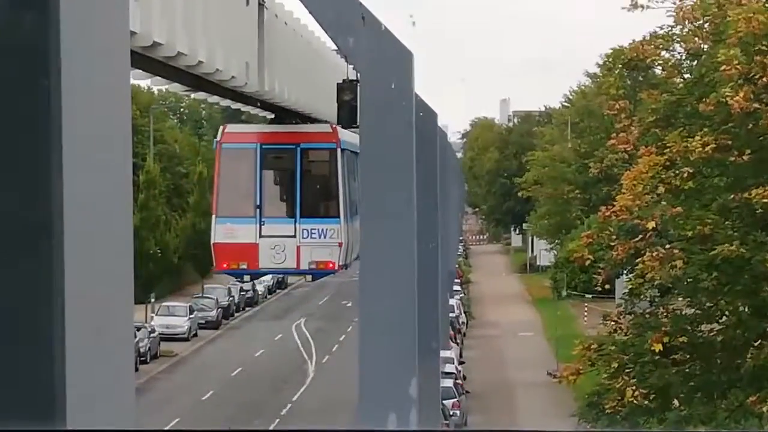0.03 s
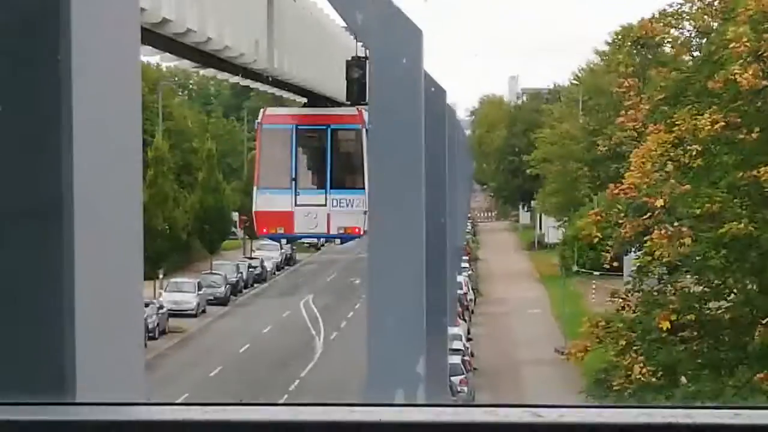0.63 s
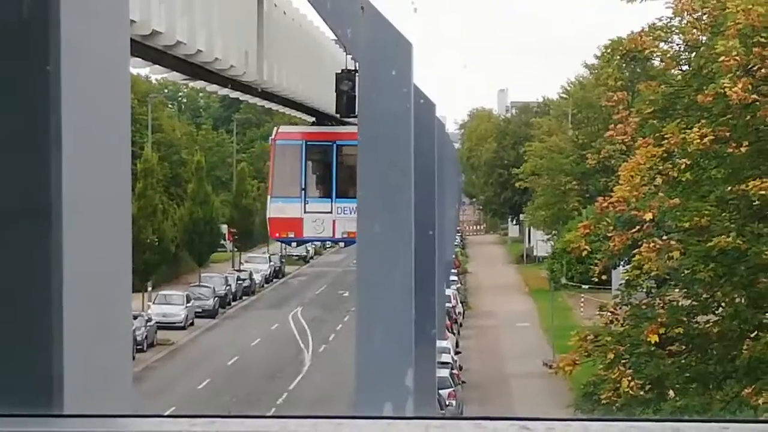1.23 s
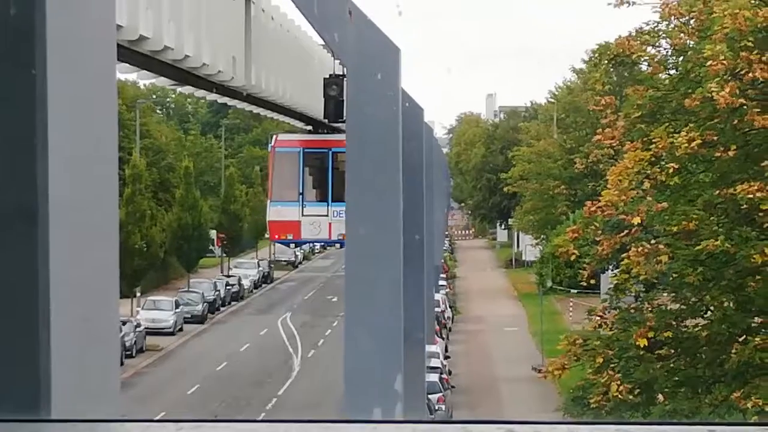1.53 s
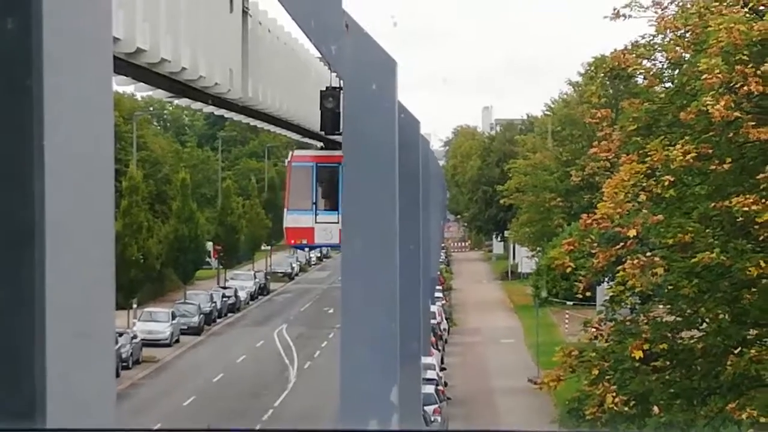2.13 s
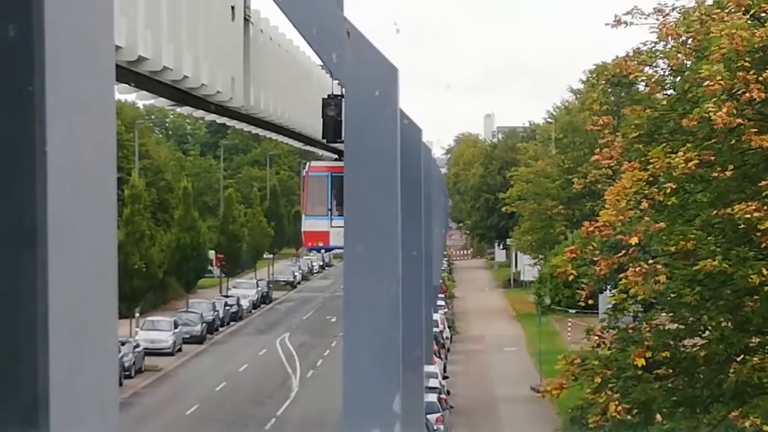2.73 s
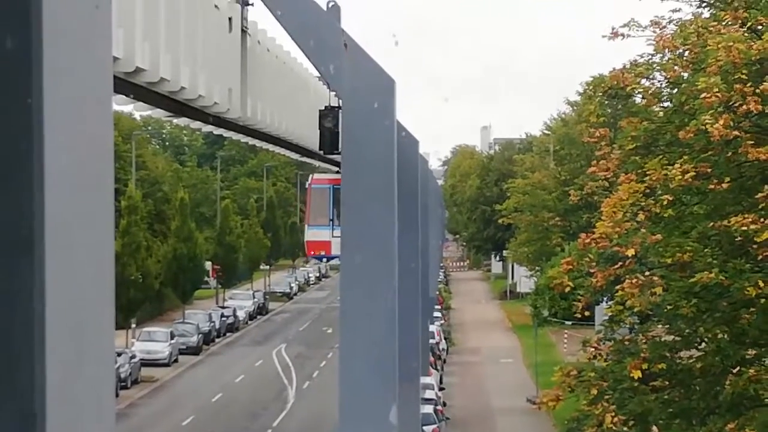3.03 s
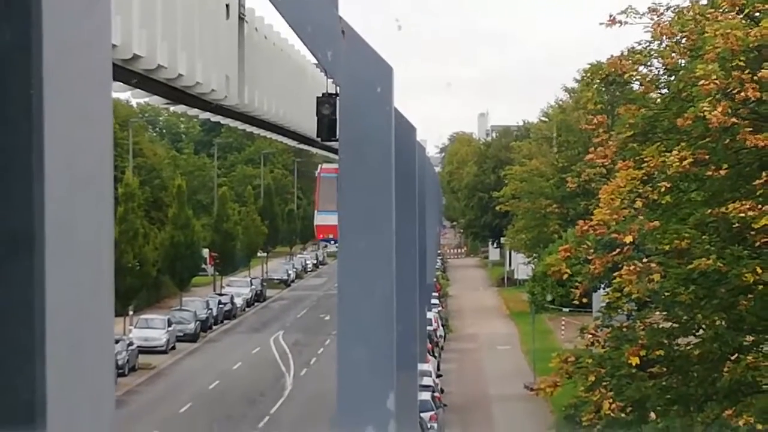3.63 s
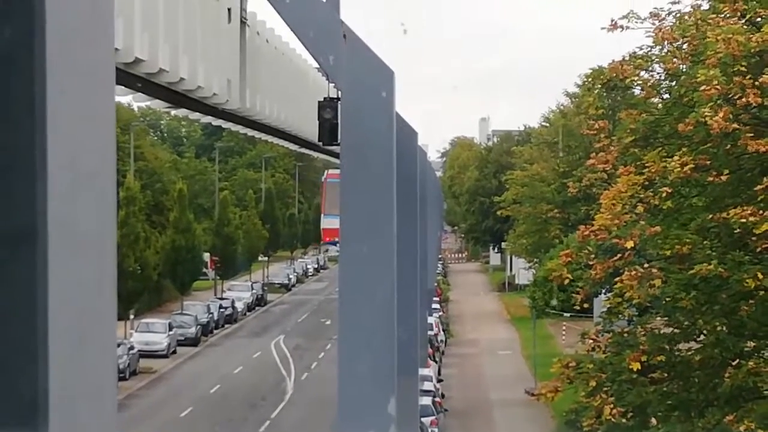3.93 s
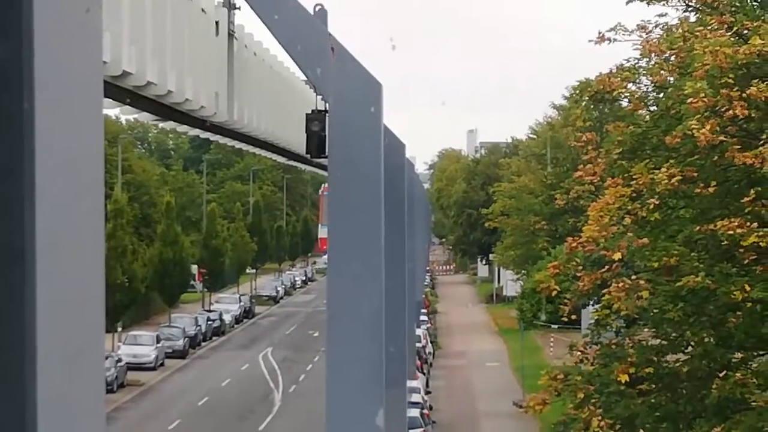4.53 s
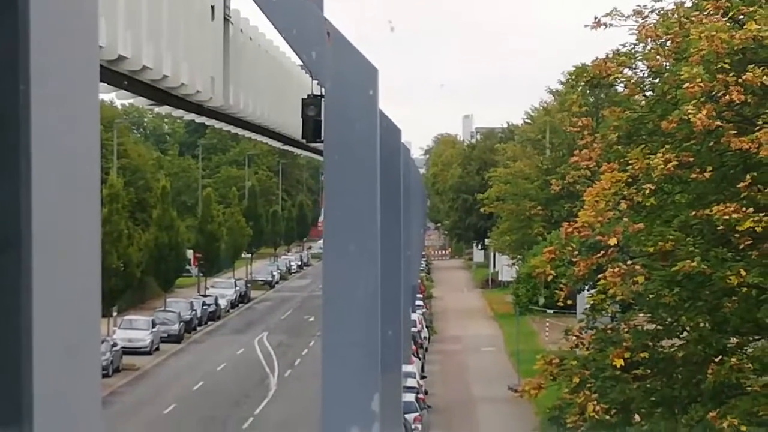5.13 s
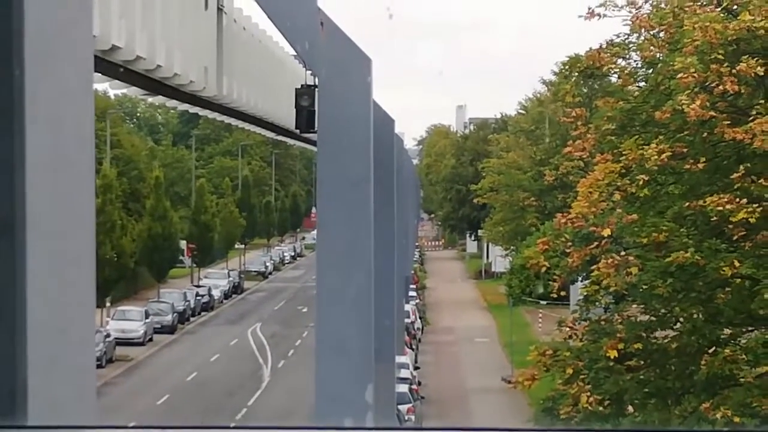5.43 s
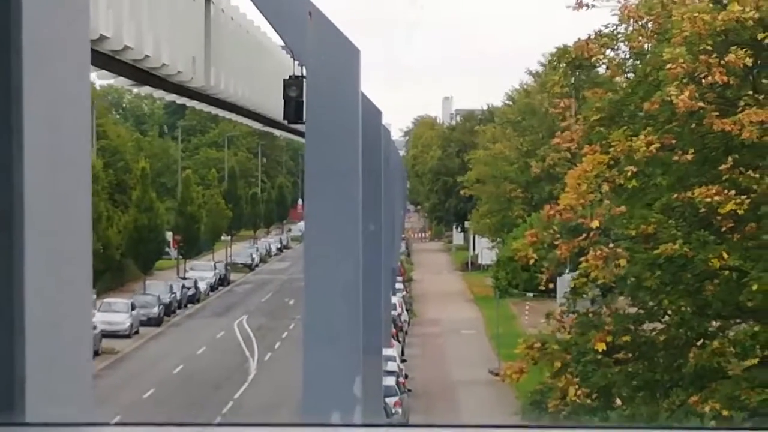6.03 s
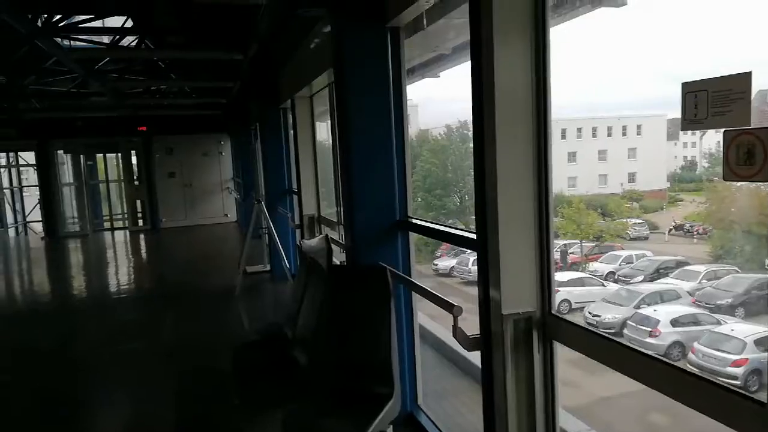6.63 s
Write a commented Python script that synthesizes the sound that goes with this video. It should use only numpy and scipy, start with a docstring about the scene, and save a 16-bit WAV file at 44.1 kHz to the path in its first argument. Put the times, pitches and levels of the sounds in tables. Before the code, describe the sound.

A suspended monorail car glides away with a low rumble and faint whine; after a brief silence, ventilation hums in a station hall.

```python
"""A suspended monorail car glides away from its station. Its wheels shake the hollow steel guideway
into a rumble, tyre treads roar softly, electrical gear whines thinly on the right, with a few faint ticks.
The sound cuts out on a soft thump. After half a second of silence comes the station hall:
ventilation booming in the low room modes, with a high hiss on the right."""
import sys
import numpy as np
from scipy.fft import rfft, irfft, next_fast_len
from scipy.io import wavfile
from scipy.ndimage import uniform_filter1d, map_coordinates

SR = 44100
rng = np.random.default_rng(int(sys.argv[2]) if len(sys.argv) > 2 else 0)


def bounce(signal):
    """Save signal as a 16-bit WAV file at the path given by the first command-line argument."""
    frames = np.transpose(np.atleast_2d(signal))
    limited = np.clip(frames, -1, 1)
    pcm = np.round(limited * 32767).astype(np.int16)
    wavfile.write(sys.argv[1], SR, pcm)


N = 303408
TIME_S = np.arange(N) / SR
CUT_OUT_S, HALL_IN_S = 6.2007, 6.672

# Envelopes. Each row: time in seconds, relative level in dB.
GIRDER_SHAKE_DB = [(0.0, -48), (1.35, -48.0), (2.1, -44.5), (2.85, -50.5), (4.0, -52), (4.4, -50),
                   (6.15, -54)]
BEAM_BOOM_DB = [(0.0, -38.0), (0.55, -40), (0.65, -45), (2.25, -44.5), (2.4, -45.5), (2.7, -39.5),
                (2.9, -49.0), (3.15, -41.5), (3.45, -53.5), (3.9, -49.5), (4.1, -40.5), (4.5, -51.5),
                (4.75, -47.0), (5.25, -53.5), (5.45, -51.5), (5.7, -54.5), (5.85, -52.5), (6.15, -59)]
TYRE_ROAR_DB = [(0.0, -53.0), (1.0, -50.5), (1.75, -51.0), (2.3, -52.5), (2.8, -52.5), (3.95, -53.5),
                (4.45, -54.5), (6.15, -53.5)]
WHINE_SWELL_DB = [(0.0, -80.0), (0.6, -76.0), (0.8, -79.5), (1.55, -73.5), (1.95, -84.0), (2.35, -76.0),
                  (2.6, -76.5), (2.8, -82.0), (3.35, -77.0), (3.5, -83.0), (4.1, -73.5), (4.25, -82.0),
                  (4.55, -72.0), (4.85, -81.0), (5.0, -74.0), (5.7, -84.0), (5.9, -77.5), (6.15, -78.0)]

# Noise spectra. Each row: frequency in Hz, relative density in dB.
RUMBLE_SPECTRUM = [(7, -16), (12, -7), (19, -4), (23, -6), (29, 0), (35, -4), (43, -1.5), (52, -6),
                   (61, -13), (90, -45)]
BOOM_SPECTRUM = [(45, -49), (60, -36.5), (69, 0.5), (76, 2.5), (84, -1.5), (100, -1.5), (118, -25.5),
                 (170, -83)]
DRONE_SPECTRUM = [(80, -30), (110, -4.5), (132, -2), (155, -1.5), (168, -1), (182, -5), (205, -11),
                  (260, -22.5), (500, -81)]
ROAR_SPECTRUM = [(250, -32.5), (480, -9.5), (580, -10.5), (800, -4), (920, -2.5), (1000, -2.5),
                 (1110, -2.5), (1250, -6), (1550, -11.5), (1850, -12.5), (2100, -27), (3200, -62.5)]
TREBLE_SPECTRUM = [(1200, -36.5), (2000, 4), (2500, 4.5), (3200, -0.5), (4300, -3.5), (5000, -8),
                   (6200, -13), (9500, -16), (12000, -33.5)]
MURMUR_SPECTRUM = [(120, -37.5), (205, -1), (235, -0.5), (265, -2.5), (305, -0.5), (360, -3), (450, -9.5),
                   (620, -21), (1200, -74)]
HALL_AIR_SPECTRUM = [(15, -3.5), (40, -11), (68, -1), (108, -1.5), (150, -8), (200, -5), (240, -17),
                     (370, -21), (470, -27), (950, -19), (1600, -28.5), (2300, -35.5), (4500, -40),
                     (6500, -47)]
HALL_HISS_SPECTRUM = [(5500, -30), (7300, -10), (8700, -2), (9900, -5), (11000, -17), (13000, -39)]
SELF_NOISE_SPECTRUM = [(300, -30), (1500, 0.5), (5000, 0.5), (7000, -.5), (10000, 0.5), (12000, -4.5),
                       (14000, -1), (15500, -12)]

# Resonances. Each row: centre in Hz, width in Hz, relative gain in dB.
TYRE_MODES = [(642.3, 21, -2.5), (780, 12, -0.5), (973, 6.3, 6), (1041, 23, 3), (1102, 16, 1.5),
              (1522, 18, -3)]
ROOM_MODES = [(62.5, 3.1, -2), (161, 18, 2), (319, 7, -9), (385, 6.5, -16), (477, 10, -17)]

# The whine's two strongest partials. Each entry: frequency in Hz.
STRONG_PARTIALS_HZ = [4452.2, 4544]
# Weak whine partials and ventilation tones. Each row: frequency in Hz, relative level in dB.
WEAK_PARTIALS = [(3843, -85), (3974, -89), (4269, -82.5), (4360.6, -84), (4635.3, -90), (4726.7, -89),
                 (4942, -93)]
FAN_TONES = [(64.6, -44), (156.1, -43)]
# Faint ticks. Each row: start in seconds, level in dB.
TICK_EVENTS = [(.298, -63), (.58, -61.5), (3.016, -66)]

# Stereo likeness. Each row: frequency in Hz, left-right coherence from 0 to 1.
COHERENCE = [(60, .998), (180, .98), (300, .85), (450, .5), (700, .2), (1100, .27), (2500, .32),
             (4500, .22), (7000, .05)]
# Stereo balance. Each row: frequency in Hz, left minus right in dB.
BALANCE_DB = [(200, 0), (350, -.7), (520, -3.5), (1050, -3.7), (1350, -4.5), (1750, -8), (2500, -8.7),
              (4400, -9.5), (9000, -10)]
# Later arrival on the left. Each row: frequency in Hz, delay in seconds.
LEFT_DELAY_S = [(60, .0003), (160, .00042), (500, .00059)]


def guideway(rumble_db=5, rumble_follows=0.88, surge_db=2.5, surge_period_s=1.07, crest_s=2.14,
             hum_hz=76, hum_db=-1, wander_hz=2.07, hum_onset_db=-44):
    """Wheels shake the hollow steel beam; driven hard, its boom firms into a hum."""
    shake_db = envelope(GIRDER_SHAKE_DB)
    boom_db = envelope(BEAM_BOOM_DB)
    surging_db = surge_db * np.cos(2 * np.pi * (TIME_S - crest_s) / surge_period_s)
    deep_db = shake_db.mean() + rumble_follows * (shake_db - shake_db.mean()) + surging_db
    hum_share = 1 / (1 + amp(2 * (hum_onset_db - boom_db)) ** 2)  # of the boom's power
    pitch_hz = hum_hz + wander_hz * wobble(9)
    hum = np.sqrt(2) * np.sin(2 * np.pi * np.cumsum(pitch_hz) / SR)
    boom_noise = steadied(stereo_noise(colour(BOOM_SPECTRUM)), span_s=0.14)
    boom = np.sqrt(1 - hum_share) * boom_noise + np.sqrt(hum_share) * amp(hum_db) * hum
    rumble = steadied(stereo_noise(colour(RUMBLE_SPECTRUM)), span_s=0.2)
    drone = steadied(stereo_noise(colour(DRONE_SPECTRUM)), span_s=0.14)
    return amp(deep_db + rumble_db) * rumble + amp(boom_db) * boom + amp(shake_db) * drone


def tyres(roar_db=2.5, singing_db=-1, treble_db=-7, dulling_db_per_s=0.38,
          murmur_db=-52.5, murmur_follows=0.45, flutter_db=0.36):
    """Tread noise peaks near 1 kHz and excites narrow resonances; distance dulls it."""
    roll_db = envelope(TYRE_ROAR_DB)
    roar = amp(roar_db) * stereo_noise(colour(ROAR_SPECTRUM))
    singing = amp(singing_db) * stereo_noise(resonances(TYRE_MODES))
    treble = amp(treble_db - dulling_db_per_s * TIME_S) * stereo_noise(colour(TREBLE_SPECTRUM))
    murmur_gain = amp(murmur_db + murmur_follows * (roll_db - roll_db.mean()))
    murmur = murmur_gain * stereo_noise(colour(MURMUR_SPECTRUM))
    return amp(roll_db + flutter_db * wobble(10)) * (roar + singing + treble) + murmur


def electric_whine(strong_db=7, strong_waver_db=1, weak_db=4.5, weak_waver_db=4,
                   drift_hz=0.5, left_db=-11):
    """Electrical partials, near steady in pitch: two swell together, the rest waver independently."""
    swell_db = envelope(WHINE_SWELL_DB) + strong_db
    partials = [(hz, swell_db + strong_waver_db * wobble(2)) for hz in STRONG_PARTIALS_HZ]
    partials += [(hz, db + weak_db + weak_waver_db * wobble(2.8)) for hz, db in WEAK_PARTIALS]
    whine = np.zeros((2, N))
    for hz, db in partials:
        phase = 2 * np.pi * np.cumsum(hz + drift_hz * wobble(3.93)) / SR
        whine += np.sqrt(2) * amp(db) * np.array([np.cos(phase), np.sin(phase)])
    return whine * amp([[left_db], [0]])


def ticks(t60_s=0.21):
    """Small dry bursts of high noise, mostly on the right."""
    gain = sum(amp(db - 60 * np.abs(TIME_S - start_s) / t60_s) * (TIME_S >= start_s)
               for start_s, db in TICK_EVENTS)
    spectrum = [(2000, -32.5), (4500, -1), (8500, -0.5), (11000, -25), (14000, -29.5)]
    return gain * stereo_noise(colour(spectrum))


def thump(start_s=6.192, low_hz=110, low_db=-29, tick_hz=1000, tick_db=-30, tick_t60_s=0.0053):
    """A low sine with a dull tick on its front; the cut-out leaves about one cycle."""
    age_s = np.maximum(TIME_S - start_s, 0)
    low = amp(low_db) * np.sin(2 * np.pi * low_hz * age_s)
    tick = amp(tick_db - 60 * age_s / tick_t60_s) * np.sin(2 * np.pi * tick_hz * age_s)
    return low + tick


def hall_ventilation(air_db=-43, boom_db=-43, hiss_db=-63, throb_db=2):
    """Ventilation hums and booms in the hall's low modes under a narrow high hiss."""
    def room_response(hz):
        # Same-sign modes cancel between peaks, keeping the tones apart.
        modes = sum(resonances([mode])(hz) for mode in ROOM_MODES)
        return modes * colour([(500, 0), (1200, -20)])(hz)

    boom = steadied(stereo_noise(room_response), span_s=0.095)
    fans = sum(np.sqrt(2) * amp(db + throb_db * wobble(20)) * np.sin(2 * np.pi * hz * TIME_S)
               for hz, db in FAN_TONES)
    air = steadied(stereo_noise(colour(HALL_AIR_SPECTRUM)), span_s=0.075)
    hiss = stereo_noise(colour(HALL_HISS_SPECTRUM))
    return fans + amp(air_db) * air + amp(boom_db) * boom + amp(hiss_db) * hiss


def microphone_hiss(level_db=-67):
    """Steady self-noise, independent in each channel."""
    return amp(level_db) * unit_rms(filtered(rng.standard_normal((2, N)), colour(SELF_NOISE_SPECTRUM)))


def amp(db):
    """Decibels to gain."""
    return 10 ** (np.asarray(db) / 20)


def unit_rms(x):
    """Scale to rms 1."""
    return x / np.sqrt(np.mean(x ** 2) + 1e-20)


def log_interp(points, hz):
    """Read (Hz, value) points on a log frequency axis."""
    knots_hz, values = np.transpose(points)
    return np.interp(np.log(hz + 1), np.log(knots_hz + 1), values)


def envelope(points):
    """Interpolate (seconds, value) points at every sample."""
    return np.interp(TIME_S, *np.transpose(points))


def wobble(knots_per_s):
    """Smooth random curve."""
    knots = rng.standard_normal(int(N * knots_per_s / SR) + 4)
    return map_coordinates(knots, [TIME_S * knots_per_s])


def filtered(x, response):
    """Apply a frequency response by padded FFT."""
    size = next_fast_len(N + SR // 2)
    return irfft(rfft(x, size) * response(np.fft.rfftfreq(size, 1 / SR)), size)[..., :N]


def colour(spectrum):
    """Response from (Hz, dB) points, falling 24 dB per octave above the last."""
    top_hz = spectrum[-1][0]
    return lambda hz: amp(log_interp(spectrum, hz)) * (top_hz / np.maximum(hz, top_hz)) ** 4


def resonances(modes):
    """Response of band-pass modes summed with alternating sign."""
    return lambda hz: sum(
        (-1) ** k * amp(db) * 1j * hz * width_hz / (centre_hz ** 2 - hz ** 2 + 1j * hz * width_hz)
        for k, (centre_hz, width_hz, db) in enumerate(modes))


def stereo_noise(response):
    """Shaped noise of rms 1: coherent in the bass, earlier and brighter on the right."""
    def mid_side_response(hz):
        angle = np.arccos(np.clip(log_interp(COHERENCE, hz), -1, 1)) / 2
        return response(hz) * np.array([np.cos(angle), np.sin(angle)])

    def left_response(hz):
        delay = np.exp(-2j * np.pi * hz * log_interp(LEFT_DELAY_S, hz))
        return amp(log_interp(BALANCE_DB, hz) / 2) * delay

    mid, side = filtered(rng.standard_normal((2, N)), mid_side_response)
    left = filtered(mid + side, left_response)
    right = filtered(mid - side, lambda hz: amp(-log_interp(BALANCE_DB, hz) / 2))
    return unit_rms(np.array([left, right]))


def steadied(noise, span_s):
    """Even out swells longer than span_s; rms 1."""
    power = uniform_filter1d(np.mean(noise ** 2, axis=0), max(int(span_s * SR), 1))
    return unit_rms(noise / np.sqrt(np.abs(power) + 0.05))


def scene():
    """Platform, silent gap, hall."""
    platform = guideway() + tyres() + electric_whine() + ticks() + thump()
    hiss = microphone_hiss()
    hall = hall_ventilation()
    return (platform + hiss) * (TIME_S < CUT_OUT_S) + (hall + hiss) * (TIME_S >= HALL_IN_S)


def record(dry, cutoff_hz=15100):
    """Steep low-pass."""
    return filtered(dry, lambda hz: 1 / np.sqrt(1 + (hz / cutoff_hz) ** 160))


dry = scene()
out = record(dry)
bounce(out)
```